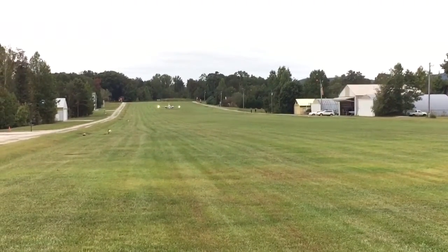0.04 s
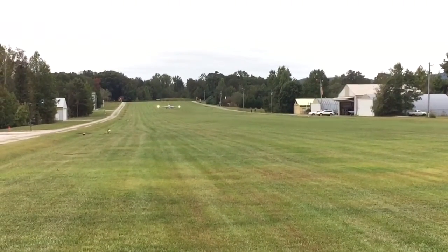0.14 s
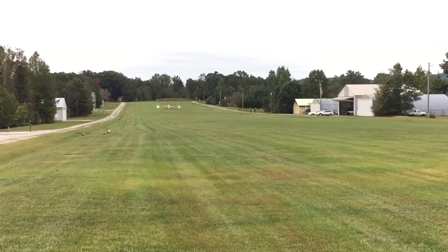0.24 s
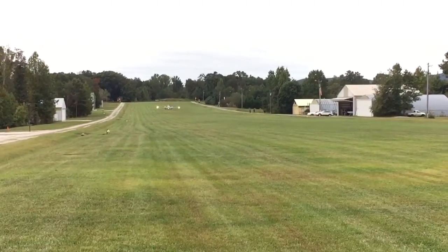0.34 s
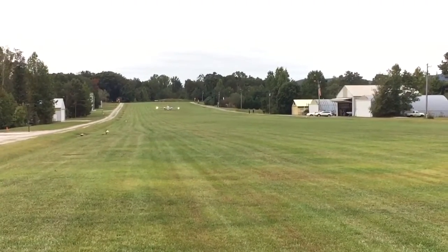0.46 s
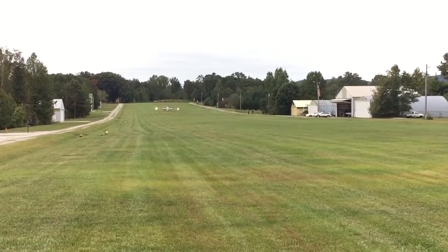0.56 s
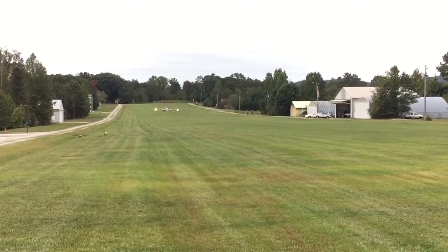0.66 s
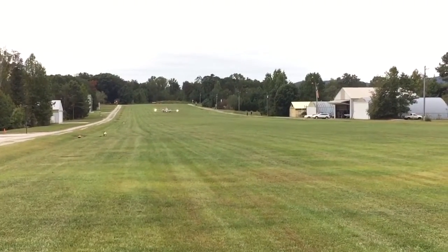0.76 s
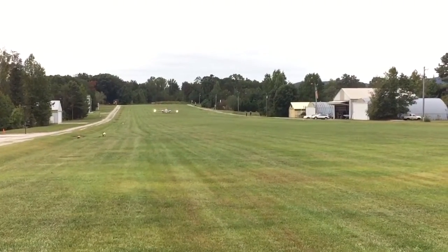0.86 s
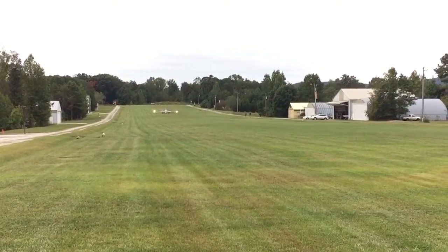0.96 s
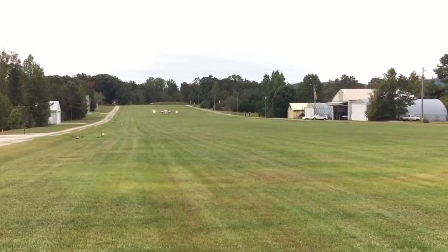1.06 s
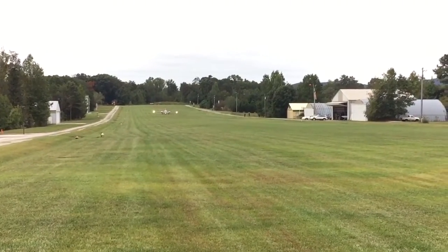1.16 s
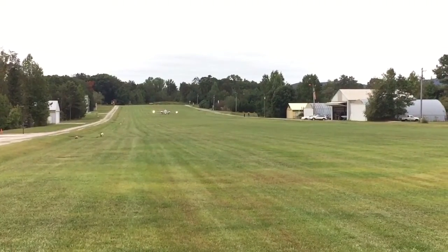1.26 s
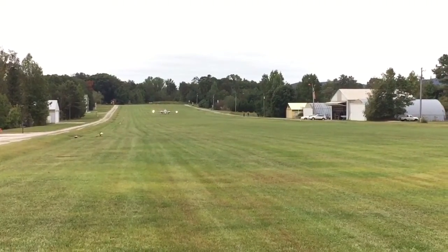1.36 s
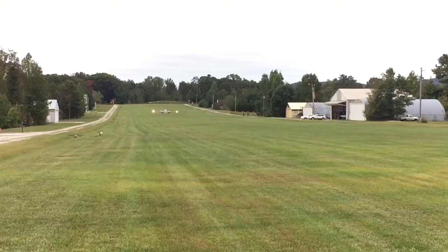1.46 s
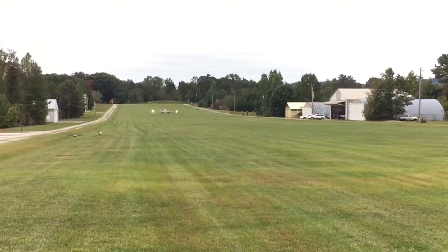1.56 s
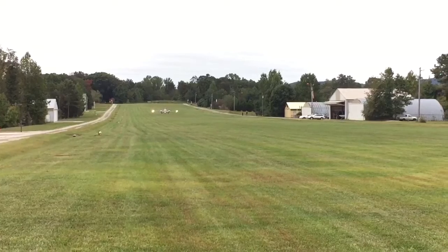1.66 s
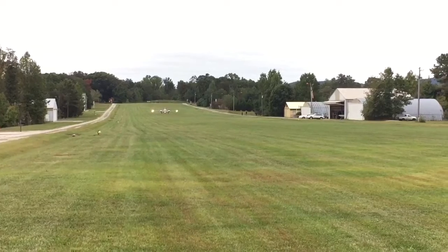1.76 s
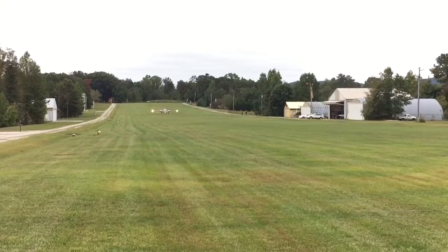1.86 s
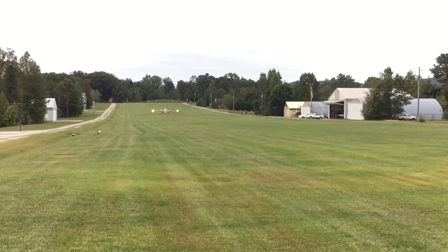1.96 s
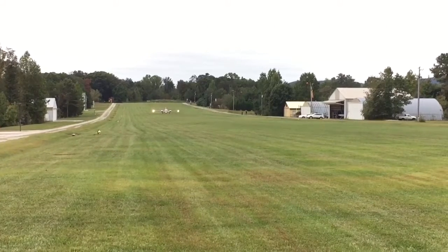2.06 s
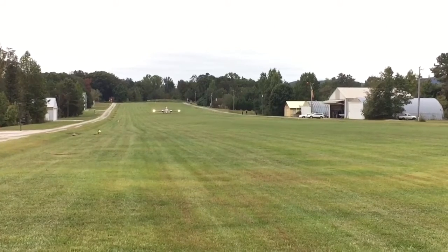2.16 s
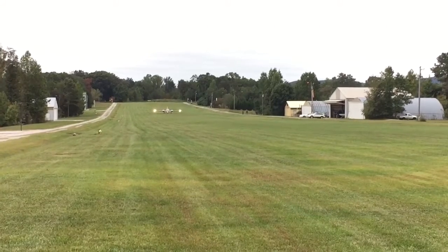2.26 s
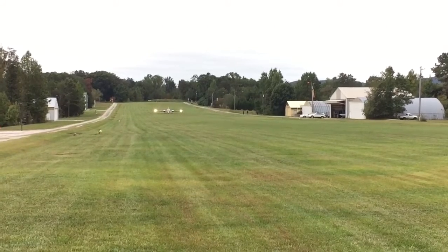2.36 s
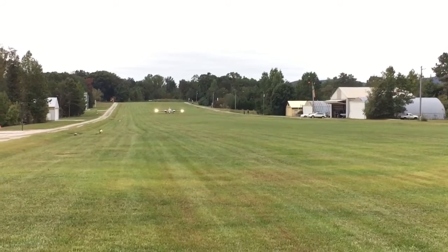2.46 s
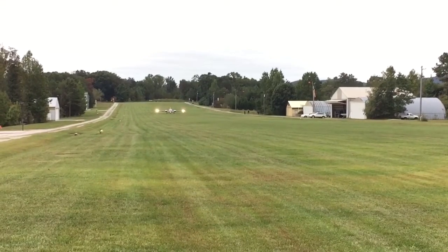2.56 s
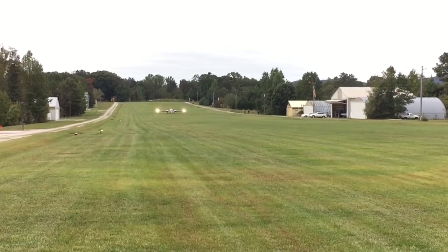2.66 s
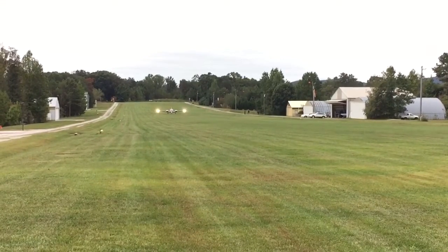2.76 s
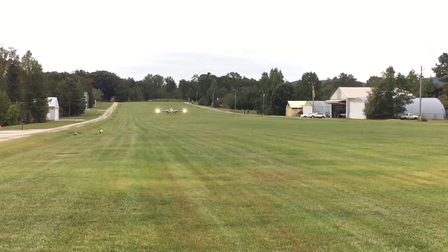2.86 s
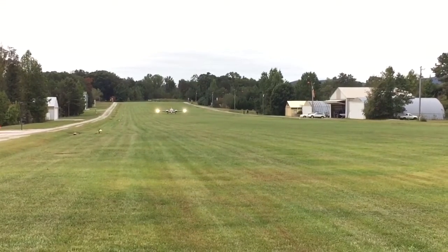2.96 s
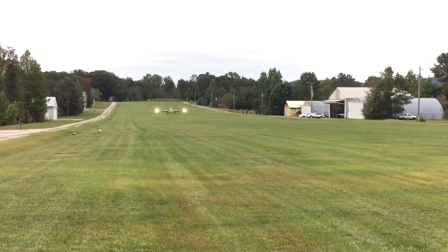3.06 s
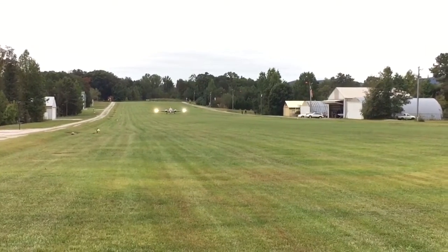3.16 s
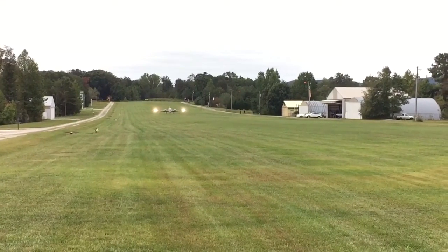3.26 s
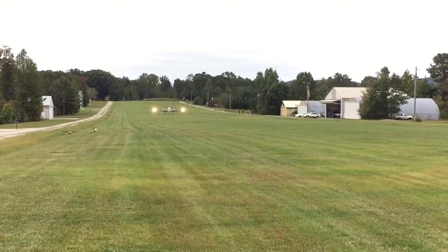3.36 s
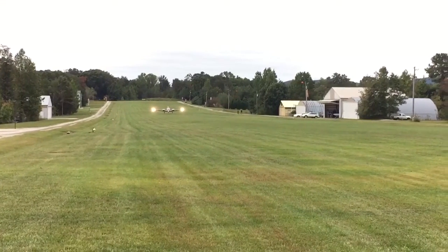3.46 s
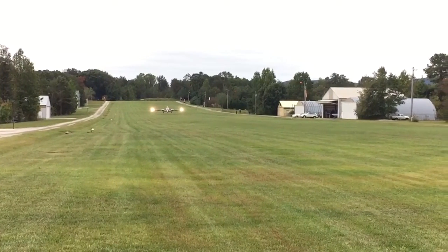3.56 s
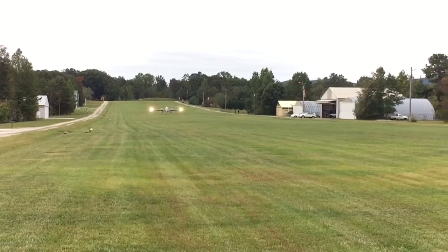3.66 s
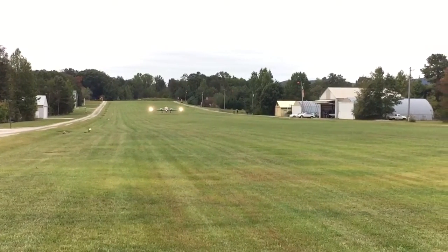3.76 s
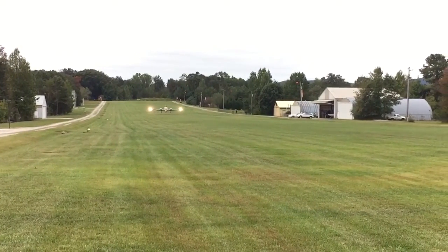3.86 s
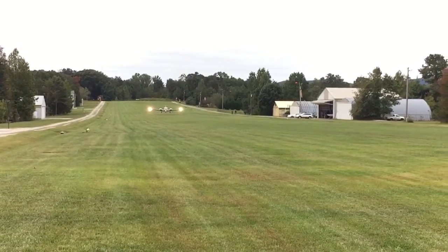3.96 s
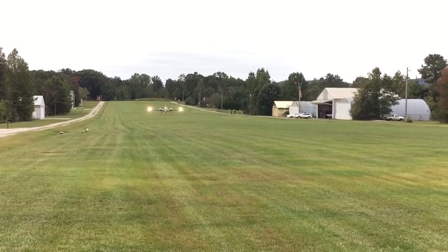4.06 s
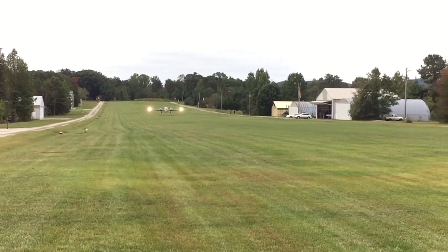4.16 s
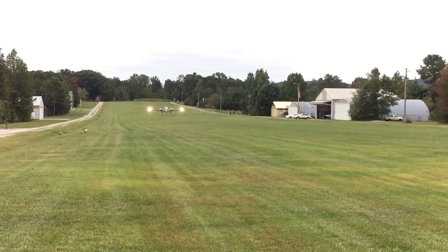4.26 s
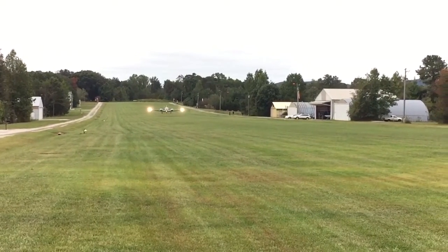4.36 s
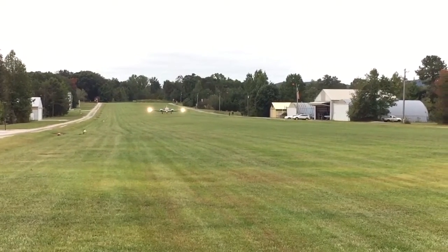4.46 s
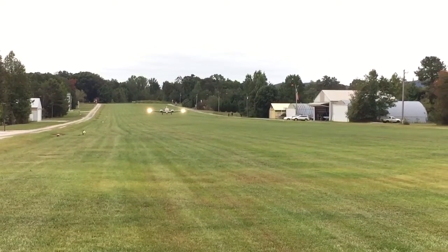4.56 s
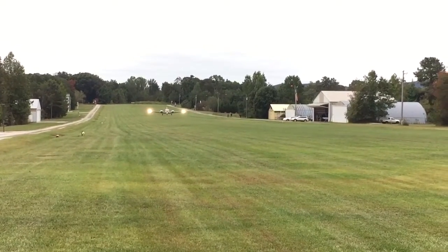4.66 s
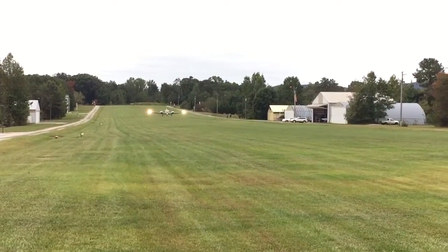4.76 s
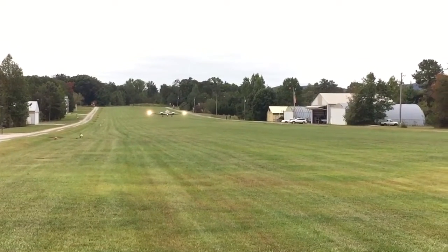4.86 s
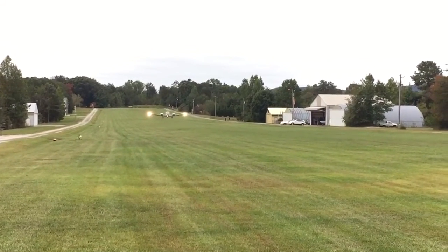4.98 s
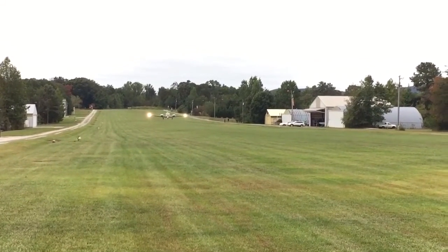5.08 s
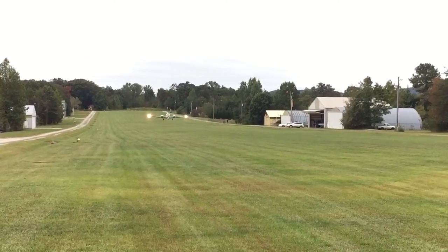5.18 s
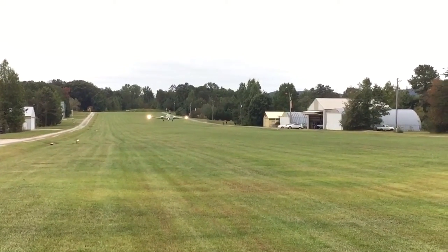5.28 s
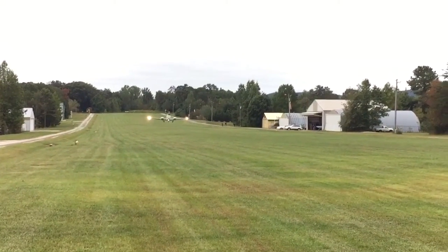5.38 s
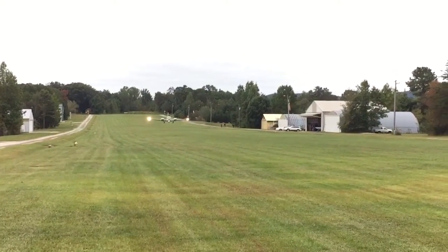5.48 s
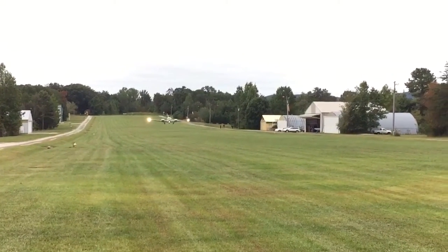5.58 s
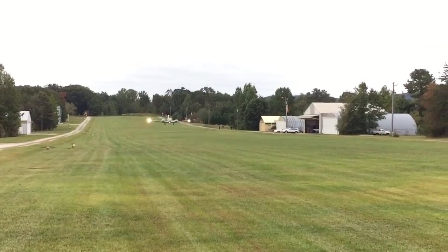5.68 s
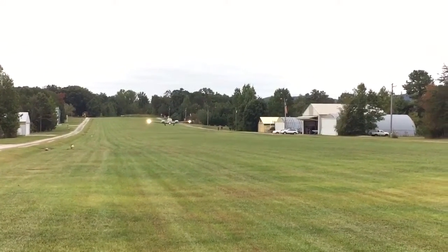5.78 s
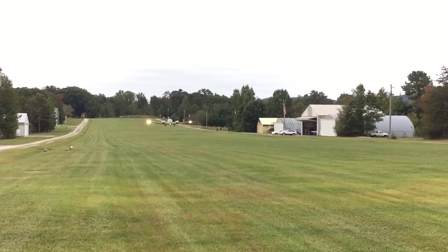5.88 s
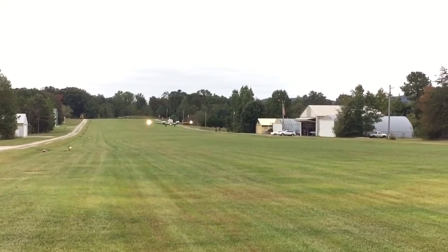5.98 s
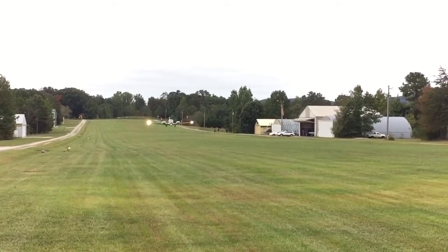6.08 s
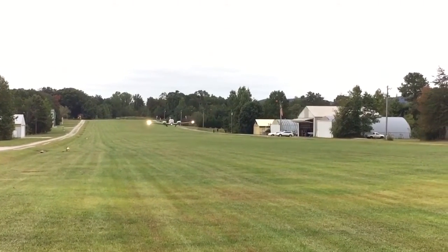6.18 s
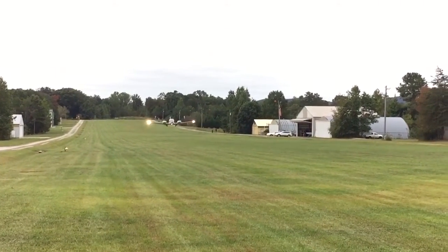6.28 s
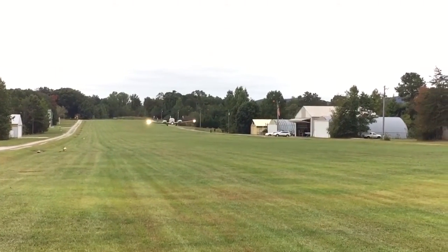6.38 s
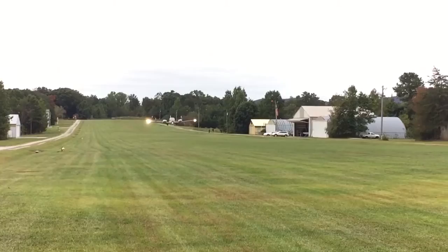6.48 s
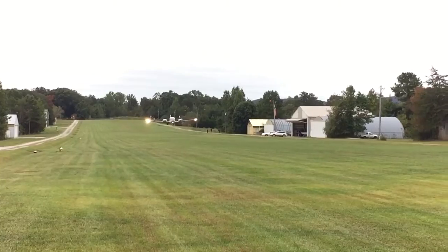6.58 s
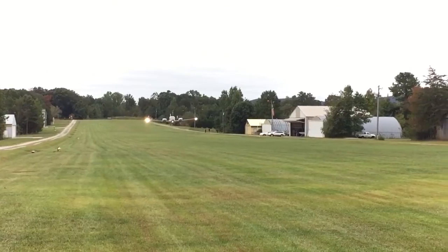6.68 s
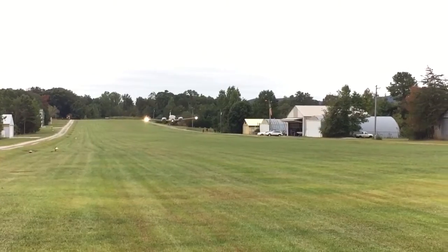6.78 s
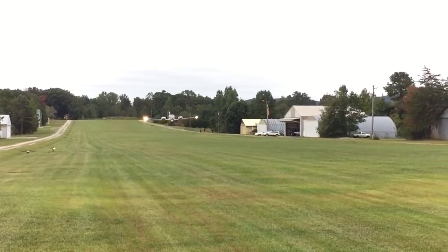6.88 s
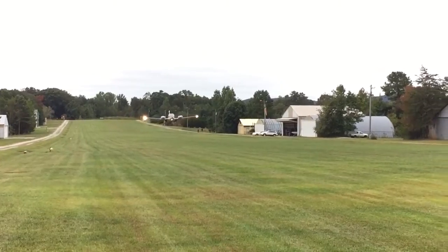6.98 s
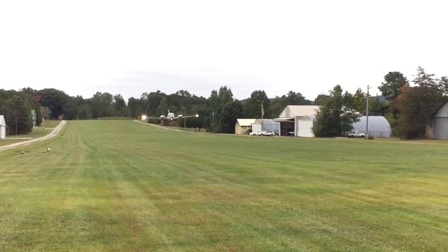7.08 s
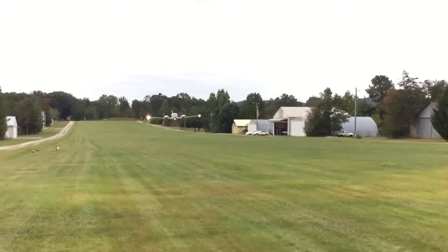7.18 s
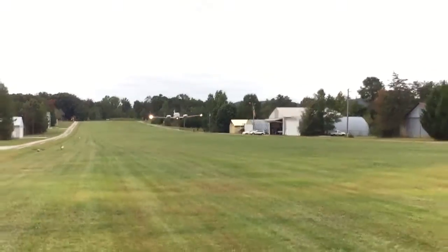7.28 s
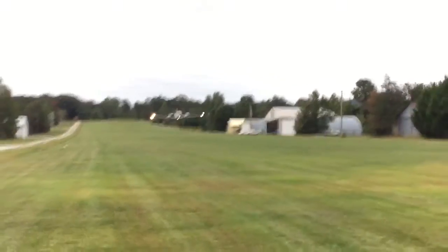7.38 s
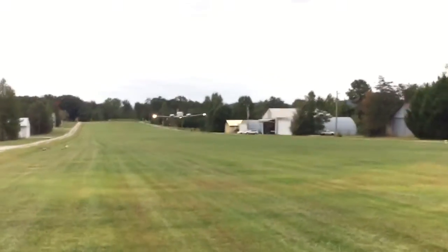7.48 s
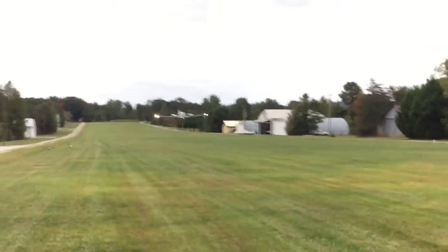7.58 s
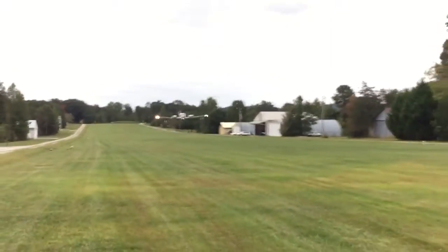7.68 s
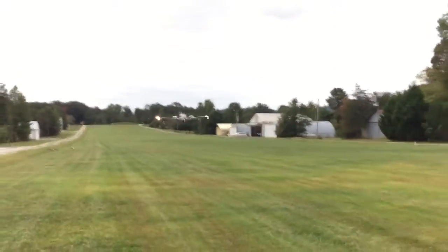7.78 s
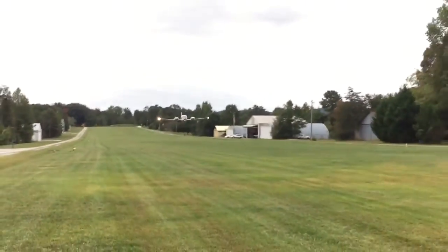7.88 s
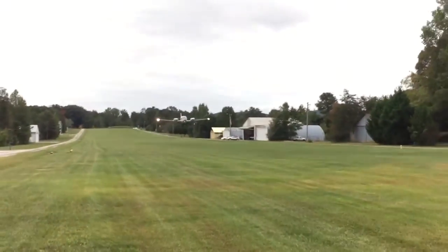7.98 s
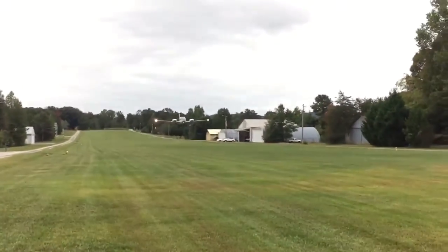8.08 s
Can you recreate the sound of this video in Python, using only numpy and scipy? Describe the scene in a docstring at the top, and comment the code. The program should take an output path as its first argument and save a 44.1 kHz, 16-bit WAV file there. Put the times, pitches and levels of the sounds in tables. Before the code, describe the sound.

Distant twin piston engines roar and drone on a grassy airfield, growing steadily louder and crackling as the aeroplane takes off and approaches.

```python
"""A light twin-engine propeller aeroplane takes off from a grass strip, coming towards the listener. Each
engine sums low orders, exhaust bangs, gated propeller noise, crackle and buzz; in step at first, they drift and
beat. Air dulls the far roar, turf swallows its low mids, and after lift-off the ground echo sweeps a treble
notch down. Single exhaust cracks and a low rumble join in; behind lie shaped noise for wind and countryside, a
hum and hiss."""
import sys
import numpy as np
from scipy import signal
from scipy.fft import rfft, irfft, next_fast_len
from scipy.io import wavfile
from scipy.ndimage import uniform_filter1d, map_coordinates

SR = 44100
rng = np.random.default_rng(int(sys.argv[2]) if len(sys.argv) > 2 else 0)


def materialize(psi):
    """Save the field psi as 16-bit PCM at rate SR to the path in sys.argv[1].

    A 1-D psi becomes a single channel; in a 2-D psi each row is a channel.
    """
    bounded = np.clip(np.atleast_2d(psi).T, -1, 1)
    quanta = np.round(bounded * 32767).astype(np.int16)
    wavfile.write(sys.argv[1], SR, quanta)


N = 358533

# propeller noise spectrum ahead of the air path: f/Hz, relative density/dB
RASP_SPECTRUM = [(100, -30.5), (320, -17), (500, -10), (850, -6.5), (1250, -1.65), (2100, -0.4), (2600, -4),
                 (3500, -0.9), (4300, -5), (5000, -9), (6600, -6.8), (7800, -12), (9300, -14), (15000, -25)]

START_M, LIFT_OFF_S = 330, 5.57


def aeroplane(second_roar_db=-3, roar_trim_db=-.3, far_rumble_db=-53.0, rumble_growth=.85):
    """Two engines whose drones beat as their speeds part; the rumble grows as distance shrinks."""
    # low engine orders: multiple of cycle rate, level/dB; 4 is the firing and blade rate
    low_orders = [(2, -20.5), (3, -14), (4, 0), (5, -18.5), (6, -27.5), (7, -25), (8, -26), (9, -30.5)]
    # drone gains: t/s, first engine/dB, second engine/dB
    drone_levels = [(0, -48.5, -53), (1.6, -49, -53), (2.6, -43, -44), (3.25, -42, -45),
                    (3.6, -41.5, -40.5), (4.6, -42.3, -36.2), (5.1, -43.3, -37.8), (5.45, -49, -39),
                    (5.68, -44.5, -41), (5.9, -44, -38.5), (6.3, -47, -41.5), (6.6, -46, -35.3),
                    (6.9, -45, -46), (7.2, -43.5, -30.5), (7.45, -40, -41.2), (7.7, -36.8, -34.3),
                    (7.92, -35, -34), (8.13, -34, -31.5)]
    # roar gain ahead of the trim: t/s, level/dB
    roar_levels = [(0.1, -38.5), (0.91, -35.5), (1.51, -35), (2.72, -29), (4.17, -27.5), (5.2, -30),
                   (5.58, -29), (8.0, -28)]
    # low rumble: f/Hz, relative density/dB
    rumble_spectrum = [(25, -40.5), (50, -17.5), (70, -6.5), (86, 2.5), (110, -7.5), (140, -11.5),
                       (190, -10), (250, -21.5), (400, -32), (900, -58)]
    swell_db, swell_at_s, swell_width_s = 5.5, 6.5, 0.66

    t = np.arange(N) / SR
    first, second = engine_cycles()
    first_db, second_db = curves(drone_levels)
    first_drone = amp(first_db) * tones(first, low_orders, waver_db=1.5)
    second_drone = amp(second_db) * tones(second, low_orders, waver_db=1.5)

    roar_db, = curves(roar_levels)
    roar = engine_roar(first) + amp(second_roar_db) * engine_roar(second)
    roar = travel(roar, air_db_per_m_khz2=.00178, turf_hz=280, turf_octaves=1.59, patchy_db=1.1)
    roar = amp(roar_db + roar_trim_db) * roar

    near_db = 20 * np.log10(START_M / distance(t))
    rumble_db = far_rumble_db + rumble_growth * near_db
    rumble_db = rumble_db + swell_db * swell(t, swell_at_s, swell_width_s)
    rumble = amp(rumble_db) * coloured(rng.standard_normal(N), rumble_spectrum)
    return first_drone + second_drone + roar + cracks() + rumble


def engine_cycles():
    """Four-stroke cycles turned, Doppler included: the rate climbs with airspeed, ever more slowly."""
    # the second engine falls behind, surges ahead at lift-off, falls back: t/s, lag of cycle rate/Hz
    lag_curve = [(2.64, 0.0), (3.1, 0.224), (3.8, 0.765), (4.4, 0.715), (5.2, 0.683), (5.55, 0.435),
                 (5.85, -0.852), (6.1, 0.189), (6.45, 0.755), (6.9, 0.934), (7.3, 0.485), (7.7, 0.532),
                 (8.13, 0.9)]
    start_hz, rise_hz_per_s, easing_hz_per_s2 = 24.476, .1657, .0045
    t = np.arange(N) / SR
    first_hz = start_hz + rise_hz_per_s * t - easing_hz_per_s2 * t ** 2
    lag_hz, = curves(lag_curve)
    return np.cumsum([first_hz, first_hz - lag_hz], axis=1) / SR


def engine_roar(cycles, exhaust_db=-3, crackle_db=-8.7, far_tips_db=-3.5, near_tips_db=-4.8,
                far_buzz_db=-10.0, near_buzz_db=-17):
    """Exhaust bangs, propeller rasp, tip bursts, crackle and buzz of one engine."""
    # buzz of blades and pipes: multiple of cycle rate, far level/dB, near level/dB (relative)
    buzz_orders = [(12, -10.5, -9.5), (16, -2.5, -6), (19, -9, 0), (20, -1, -3.5), (23, 1, -1),
                   (24, -2, -3), (26, -5, -6), (27, 3.5, 0), (28, -0.5, -5), (31, -5.5, 0), (35, -6, 2),
                   (41, -3, -4.5), (43, -1, -5), (48, 5, -5), (49, 0, -5), (54, 0.5, -2.5)]
    bangs = exhaust(cycles, jitter_s=.00006, scatter_db=0.7, ring_s=0.0052, drift_rate_per_s=1.3)
    air = rasp(cycles, cycle_depth=0.19, shaft_depth=0.17, blade_depth=.12, tip_depth=.22)
    tips = blade_tips(cycles, sharpness=4, second_burst=0.31, low_hz=3100)
    spikes = crackle(cycles, spread_db=6.5, jitter_s=.0002)

    # the buzz sinks into the rasp as the aeroplane nears
    orders = [(order, np.linspace(far_db, near_db, N)) for order, far_db, near_db in buzz_orders]
    buzz = unit(tones(cycles, orders, waver_db=2.6, waver_rate_per_s=5, stray_turns=.06))
    buzz_gain = amp(np.linspace(far_buzz_db, near_buzz_db, N))
    tips_gain = amp(np.linspace(far_tips_db, near_tips_db, N))
    return amp(exhaust_db) * bangs + air + tips_gain * tips + amp(crackle_db) * spikes + buzz_gain * buzz


def exhaust(cycles, jitter_s, scatter_db, ring_s, drift_rate_per_s, cylinders=4):
    """Each cylinder bangs once a cycle; its pipe ring drifts between two shapes, so partials come and go."""
    # exhaust spectrum ahead of the air path: f/Hz, relative density/dB
    bang_spectrum = [(130, -48.5), (250, -19), (400, -19), (650, -12), (1200, 1), (2000, 0), (3000, -8),
                     (5000, -15), (9000, -24.5), (15000, -44.5)]
    t = np.arange(SR // 40) / SR
    out = np.zeros(N)
    for cylinder in range(cylinders):
        times = moments(cycles, cylinder / cylinders)
        late, size = rng.standard_normal((len(times), 2)).T
        bangs = pulses(times + jitter_s * late, amp(scatter_db * size))
        turn_rad = 2 * wobble(drift_rate_per_s)
        for share in (np.cos(turn_rad), np.sin(turn_rad)):
            pipe = unit(rng.standard_normal(len(t)) * np.exp(-t / ring_s))
            out += signal.oaconvolve(share * bangs, pipe)[:N]
    return coloured(out, bang_spectrum)


def rasp(cycles, cycle_depth, shaft_depth, blade_depth, tip_depth):
    """Turbulent air, gated by the cycle, the shaft, the blades and twice the blade rate."""
    log_gate = np.zeros(N)
    for order, depth in zip((1, 2, 4, 8), (cycle_depth, shaft_depth, blade_depth, tip_depth)):
        log_gate += depth * np.cos(2 * np.pi * (order * cycles + rng.random()))
    return coloured(np.exp(log_gate) * rng.standard_normal(N), RASP_SPECTRUM)


def blade_tips(cycles, sharpness, second_burst, low_hz):
    """Each blade swinging towards the listener throws a bright burst, a weaker one half a beat later."""
    facing = np.cos(2 * np.pi * (4 * cycles + rng.random()))
    gate = np.exp(sharpness * (facing - 1)) + second_burst * np.exp(sharpness * (-facing - 1))
    flicker = amp(1.5 * wobble(40))
    bursts = coloured(gate * flicker * rng.standard_normal(N), RASP_SPECTRUM)
    return unit(filtered(bursts, lambda hz: hz ** 2 / (hz ** 2 + low_hz ** 2)))


def crackle(cycles, spread_db, jitter_s, per_cycle=8):
    """Sharp pressure spikes of uneven size, twice per blade passage."""
    times = moments(per_cycle * cycles, 0)
    late, size = rng.standard_normal((len(times), 2)).T
    spikes = pulses(times + jitter_s * late, -amp(spread_db * np.minimum(size, 2.55)))
    return unit(filtered(coloured(spikes, RASP_SPECTRUM), lambda hz: hz / np.hypot(hz, 1200)))


def tones(cycles, orders, waver_db, waver_rate_per_s=3, stray_turns=.05, firing_waver_db=0.15):
    """Engine orders, each wavering by itself in level and phase; the firing order is steadiest."""
    out = np.zeros(N)
    for order, db in orders:
        order = round(order)
        if order == 4:  # firing order
            stray, depth_db = 0, firing_waver_db
        else:
            stray, depth_db = rng.random() + stray_turns * wobble(waver_rate_per_s), waver_db
        gain = amp(db + depth_db * wobble(waver_rate_per_s))
        out += gain * np.sin(2 * np.pi * (order * cycles + stray))
    return np.sqrt(2) * out


def cracks(ring_s=0.00029, ring_hz=2000, top_hz=6500):
    """Single exhaust cracks: short damped pressure rings, softened at the top."""
    # cracks ahead of the low-pass: t/s, peak level/dB
    crack_list = [(3.744, -14), (3.747, -12), (3.953, -13), (4.036, -12), (4.063, -14), (4.814, -14),
                  (5.744, -10), (6.498, -15), (6.825, -15), (6.905, -12)]
    t = np.arange(SR // 200) / SR
    snap = -np.exp(-t / ring_s) * np.cos(2 * np.pi * ring_hz * t)
    times, db = np.transpose(crack_list)
    snaps = signal.fftconvolve(pulses(times, amp(db)), snap)[:N]
    return filtered(snaps, lambda hz: 1 / (1 + (hz / top_hz) ** 8))


def travel(x, air_db_per_m_khz2, turf_hz, turf_octaves, patchy_db):
    """Air, turf and ground echo colour the roar; its mid band is levelled before the band accents."""
    # treble hollow, scaled by grazing: t/s, centre f/Hz, depth/dB
    hollow_curve = [(0.2, 2650, 2.5), (1.1, 2500, 8), (1.9, 2620, 5.5), (2.3, 3290, 3), (2.7, 3560, 4),
                    (3.3, 3800, 4.5)]
    # roar bands that stand out or recede once airborne: f/Hz, width/Hz, level/dB
    airborne_bands = [(250, 80, 3), (800, 130, 3), (1140, 110, -1.5), (1450, 110, 2.2), (1780, 120, -1.5),
                      (2110, 100, 1.4), (3130, 160, 2.4)]
    # narrow, nasal colour far off: f/Hz, width/Hz, level/dB
    far_bands = [(460, 80, -2.5), (655, 58, 0.5), (820, 80, -.5), (1193, 46, 3), (1610, 350, -1.15)]
    clear_at_s, clear_takes_s = 3.41, .21
    near_m, near_fade_m = 137, 34
    grazing_db_per_khz, head_on_lift_db_per_khz = 1.14, 0.36
    hollow_width_hz = 610
    turf_db, turf_at_s, turf_width_s = 15.5, 2.99, 1.74
    edge_full_db, edge_start_hz, edge_at_s = 22, 10200, 7
    edge_fall_octaves_per_s, edge_octaves = .64, 0.39
    soften_full_db, soften_hz, soften_octaves = 5, 2300, 1

    hz, t, z = signal.stft(x, SR, nperseg=1024)
    hz = hz[:, None]
    khz = hz / 1000
    metres = distance(t)

    # far off, sound grazes the ground: dull until the way clears
    grazing = 1 - onset(t, clear_at_s, clear_takes_s)
    tilt_db = (grazing_db_per_khz * grazing - head_on_lift_db_per_khz) * khz
    hollow_hz, depth_db = curves(hollow_curve, t)
    hollow_db = depth_db * grazing * swell(hz, hollow_hz, hollow_width_hz)

    # turf swallows most around the middle of the run
    turf_amount_db = turf_db * swell(t, turf_at_s, turf_width_s)
    turf_loss_db = turf_amount_db * swell(np.log2((hz + 1) / turf_hz), 0, turf_octaves)

    # close by, the mids soften and a second hollow slides down the upper treble
    near = 1 - onset(metres, near_m, near_fade_m)
    edge_hz = edge_start_hz * 2 ** (-edge_fall_octaves_per_s * (t - edge_at_s))
    edge_db = edge_full_db * near * swell(np.log2((hz + 1) / edge_hz), 0, edge_octaves)
    soften_db = soften_full_db * near * swell(np.log2((hz + 1) / soften_hz), 0, soften_octaves)

    # air absorption grows with distance and frequency squared
    air_loss_db = air_db_per_m_khz2 * metres * khz ** 2
    loss_db = air_loss_db + tilt_db + hollow_db + turf_loss_db + edge_db + soften_db
    gain = amp(-loss_db) * ground_echo(hz, t)

    # eddies in the air make patches of the spectrum swell and fade
    patches = uniform_filter1d(rng.standard_normal(z.shape), 10, axis=0)
    patches = uniform_filter1d(patches, 16, axis=1)
    gain = gain * amp(patchy_db * unit(patches))

    # level the mid band in every frame
    power = np.mean(np.abs(z) ** 2, axis=1, keepdims=True)
    mid = (hz > 900) & (hz < 2600)
    gain = gain / np.sqrt(np.sum(mid * power * gain ** 2, axis=0) / power.sum())

    airborne = onset(t, LIFT_OFF_S, clear_takes_s)
    accents_db = airborne * bands(airborne_bands, hz) + grazing * bands(far_bands, hz)
    return signal.istft(z * gain * amp(accents_db), SR, nperseg=1024)[1][:N] / np.std(x)


def ground_echo(hz, t):
    """Direct sound plus bounce: nearer and higher lowers the notch; the source's size blurs it."""
    engine_height_m, climb_m_per_s = 1.83, .25
    ear_height_m, sound_m_per_s = 1.3, 343
    full_strength, rise_s, height_spread = .72, 1.55, .07
    airborne_s = np.maximum(t - LIFT_OFF_S, 0)
    height_m = engine_height_m + climb_m_per_s * airborne_s
    delay_s = 2 * height_m * ear_height_m / distance(t) / sound_m_per_s
    turn_rad = 2 * np.pi * hz * delay_s
    echo = full_strength * np.minimum(airborne_s / rise_s, 1)
    blur = np.exp(-(height_spread * turn_rad) ** 2 / 2)
    return np.sqrt(1 + echo ** 2 + 2 * echo * blur * np.cos(turn_rad))


def distance(t):
    """Metres left to the listener under steady acceleration, at least 20."""
    speed_m_per_s, accel_m_per_s2 = 8.93, 4.16
    return np.maximum(START_M - speed_m_per_s * t - accel_m_per_s2 * t ** 2 / 2, 20)


def field_air(hum_hz=213, hum_db=-64, countryside_db=-63):
    """Breeze on the microphone and countryside rush, both shaped noise, with a faint steady sine hum."""
    # wind on the microphone: t/s, level/dB
    breeze_levels = [(0, -59.5), (2, -82), (6.2, -77.5), (8.13, -54.5)]
    # wind noise: f/Hz, relative density/dB
    wind_spectrum = [(12, -5.5), (35, -0.5), (55, -1.5), (100, -13), (300, -50.5)]
    # low countryside rush: f/Hz, relative density/dB
    countryside_spectrum = [(20, -15), (50, -1), (280, 1), (380, -10), (900, -25), (4000, -60)]
    wind_db, = curves(breeze_levels)
    hum = np.sqrt(2) * np.sin(2 * np.pi * hum_hz * np.arange(N) / SR)
    countryside = coloured(rng.standard_normal(N), countryside_spectrum)
    wind = coloured(rng.standard_normal(N), wind_spectrum)
    return amp(wind_db) * wind + amp(countryside_db) * countryside + amp(hum_db) * hum


def amp(db):
    """Decibels to gain."""
    return 10 ** (np.asarray(db) / 20)


def unit(x):
    """x at rms 1."""
    return x / np.sqrt(np.mean(x ** 2) + 1e-20)


def curves(rows, times=None):
    """Each column after the time, per sample or at the given times."""
    s, *cols = np.transpose(rows)
    at = np.arange(N) / SR if times is None else times
    return [np.interp(at, s, c) for c in cols]


def wobble(rate_per_s):
    """A smooth random curve through rate_per_s knots a second."""
    knots = rng.standard_normal(int(N * rate_per_s / SR) + 4)
    return map_coordinates(knots, [np.arange(N) * rate_per_s / SR])


def filtered(x, response):
    """x times a function of frequency in Hz."""
    size = next_fast_len(N + 8192)
    return irfft(rfft(x, size) * response(np.fft.rfftfreq(size, 1 / SR)), size)[:N]


def coloured(x, spectrum):
    """x shaped by (f/Hz, level/dB) points, at rms 1."""
    f, db = np.transpose(spectrum)
    return unit(filtered(x, lambda hz: amp(np.interp(np.log(hz + 1), np.log(f), db))))


def pulses(times, sizes):
    """Impulses, each shared between its two nearest samples."""
    place = np.clip(times * SR, 0, N - 2)
    i = place.astype(int)
    return np.bincount(i, sizes * (1 - place + i), N) + np.bincount(i + 1, sizes * (place - i), N)


def moments(cycles, share):
    """Times in s at which an engine passes a given share of its cycle."""
    return np.interp(np.arange(int(cycles[-1])) + share, cycles, np.arange(N) / SR)


def onset(t, at, takes):
    """A smooth step from 0 to 1, in the unit of t."""
    return (1 + np.tanh((t - at) / takes / 2)) / 2


def swell(x, centre, width):
    """A Gaussian bell of height 1."""
    return np.exp(-((x - centre) / width) ** 2)


def bands(table, hz):
    """Summed dB of (f/Hz, width/Hz, level/dB) bells."""
    return sum(db * swell(hz, centre, width) for centre, width, db in table)


def scene():
    """The aeroplane over the quiet field."""
    return (aeroplane() + field_air())[None]


def record(dry, hiss_db=-85.5, top_hz=15750):
    """Microphone colour, its own hiss and the band limit."""
    # microphone colour: f/Hz, width/Hz, level/dB
    microphone_bands = [(1420, 110, 1), (2053, 120, 2), (2936, 96, -11.5), (10400, 300, -9.5)]
    sound = filtered(dry[0], lambda hz: amp(bands(microphone_bands, hz)))
    sound = sound + amp(hiss_db) * rng.standard_normal(N)
    return filtered(sound, lambda hz: hz < top_hz)[None]


dry = scene()
out = record(dry)
materialize(out)
```